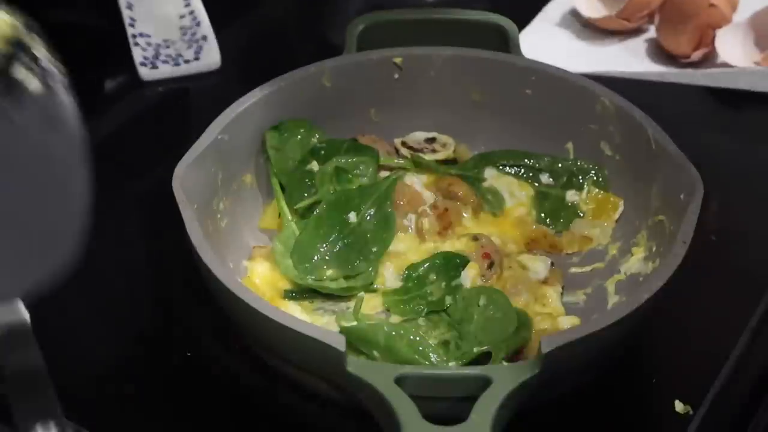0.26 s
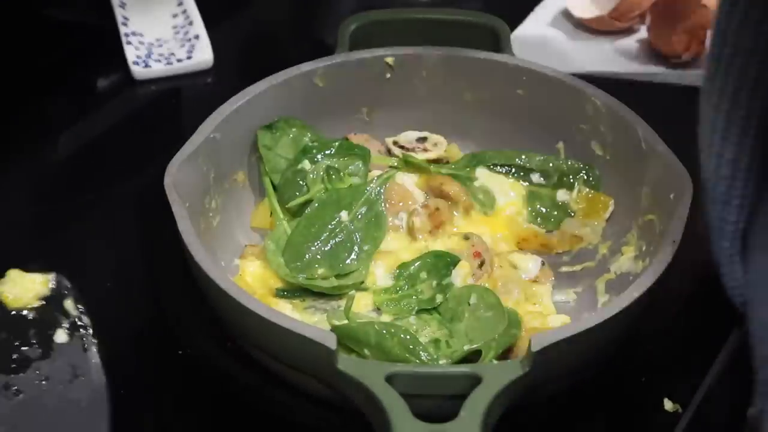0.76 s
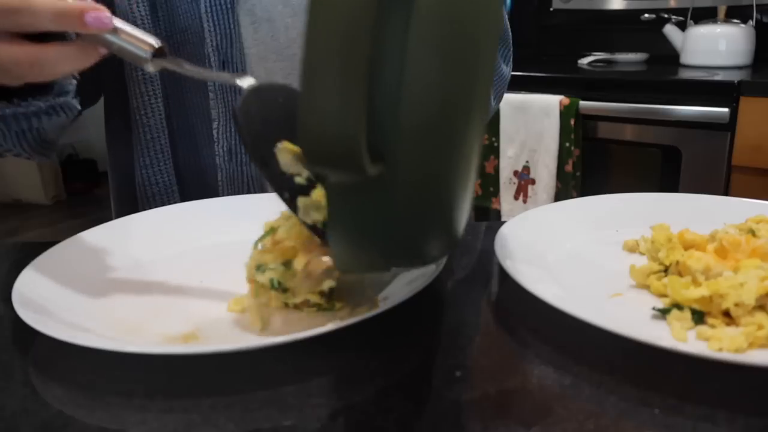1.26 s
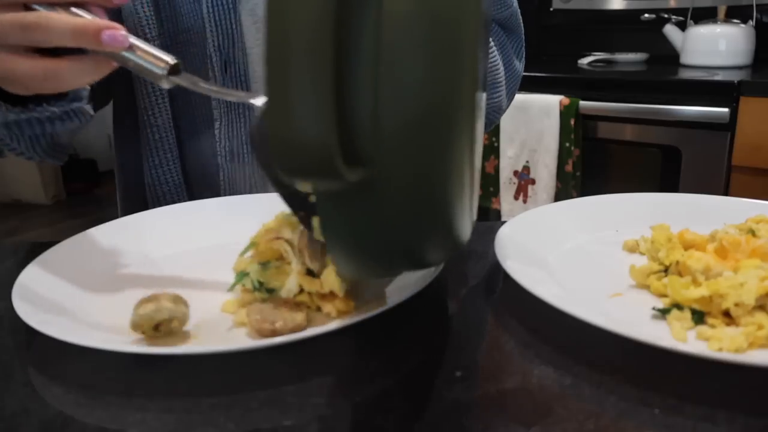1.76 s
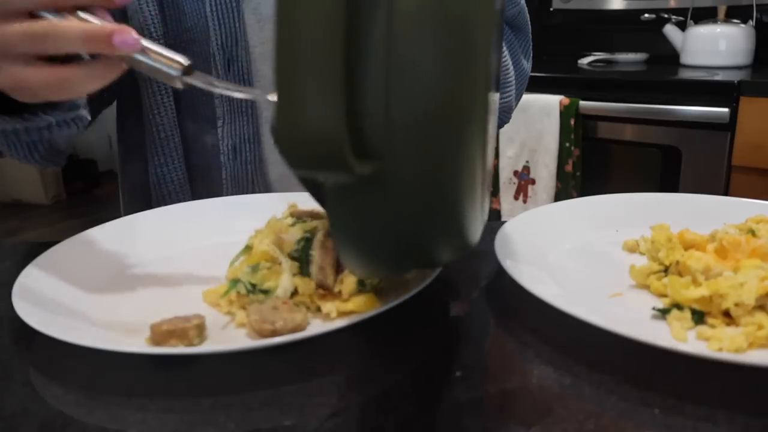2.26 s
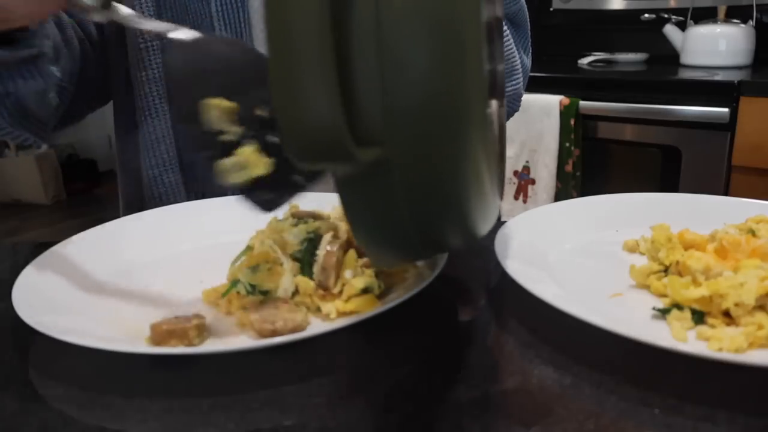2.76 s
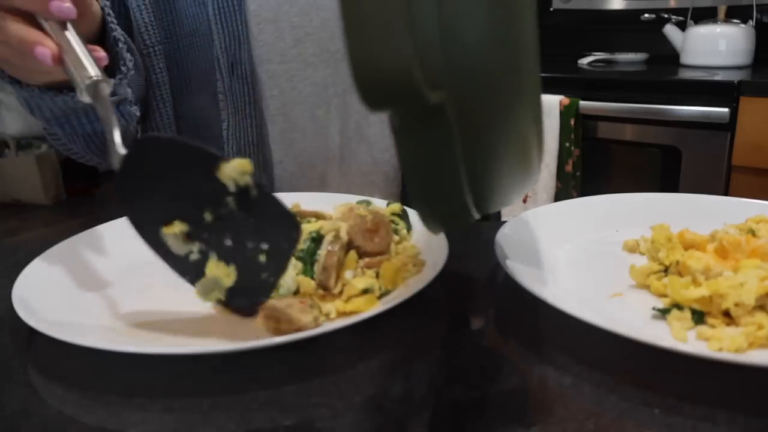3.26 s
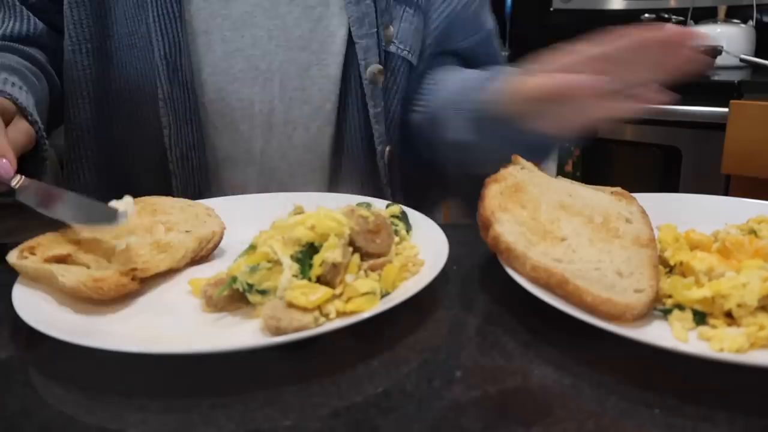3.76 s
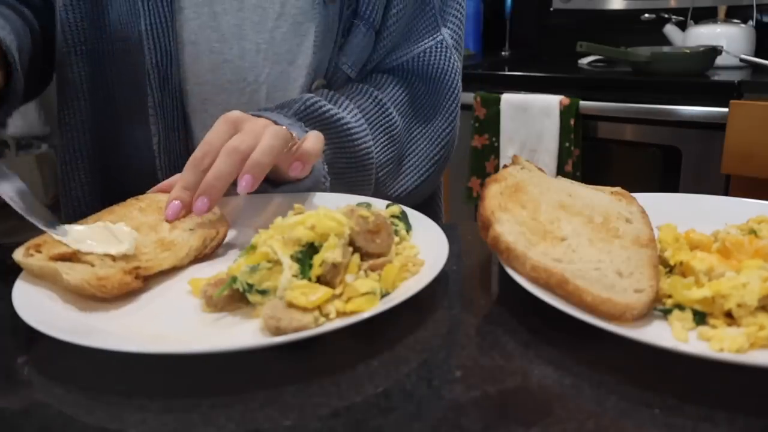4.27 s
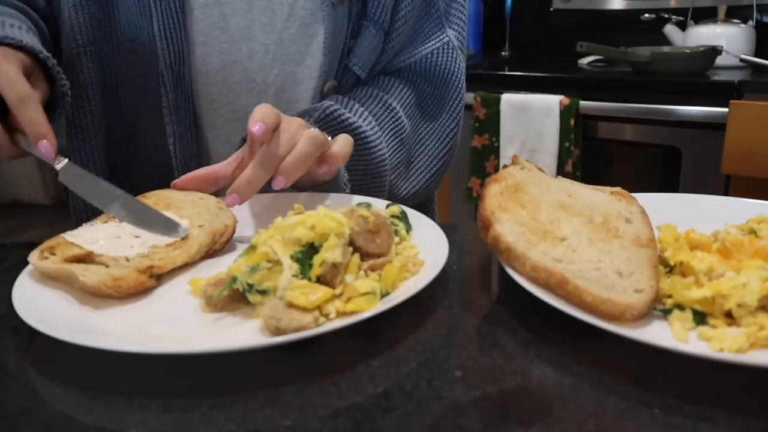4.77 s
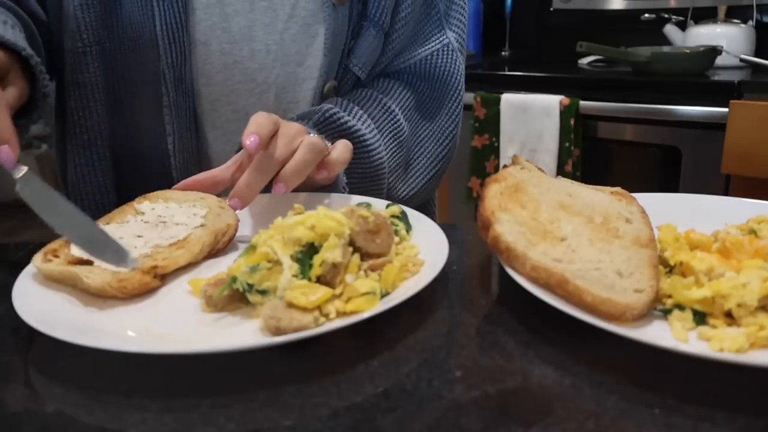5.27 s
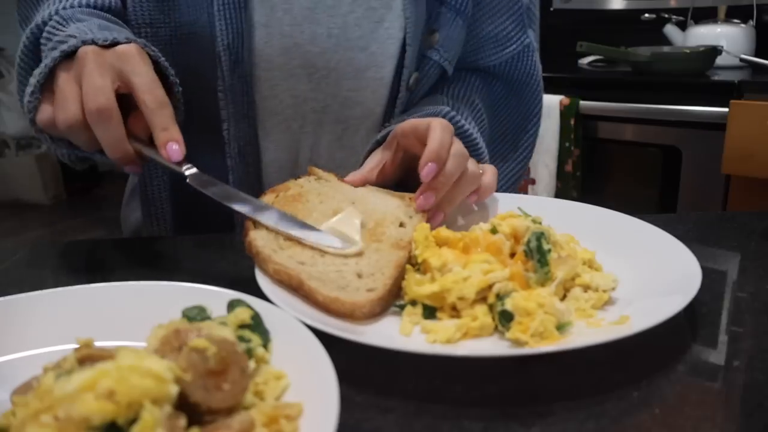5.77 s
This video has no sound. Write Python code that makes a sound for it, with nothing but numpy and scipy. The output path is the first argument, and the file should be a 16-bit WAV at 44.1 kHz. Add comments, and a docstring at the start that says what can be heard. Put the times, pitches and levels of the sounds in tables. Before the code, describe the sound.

Eggs sizzle in a pan with a loud utensil clank, then soft spatula taps on a plate, then a knife scrapes butter over crisp toast.

```python
"""A knife taps, bites and scrapes butter over crisp toast on a plate: clumped grains of noise and short noise
bursts, passed through the ringing tones of plate and knife. Earlier, a spatula taps pan and plate while serving;
hard walls answer all these taps and snaps. At the start eggs sizzle in a pan (grainy noise with tiny tone spits) and
a utensil bangs down by the stove (noise bursts, rattle and a boom). Appliances rumble throughout (noise and hum).
"""
import sys
import numpy as np
from scipy import signal
from scipy.fft import rfft, irfft, next_fast_len
from scipy.io import wavfile
from scipy.ndimage import uniform_filter1d, map_coordinates

SR = 44100
rng = np.random.default_rng(int(sys.argv[2]) if len(sys.argv) > 2 else 0)


def transcribe(signal):
    """Save signal, clipped to [-1, 1], as a 16-bit WAV file at the path in sys.argv[1]."""
    frames = np.atleast_2d(signal).T
    limited = np.clip(frames, -1, 1)
    pcm = np.round(limited * 32767).astype(np.int16)
    wavfile.write(sys.argv[1], SR, pcm)


N = 265349  # length [samples]

# Moments when ringing tails stop short; the sizzle ends at the first: time [s]
TAIL_STOPS = [1.167, 5.572]
TOAST_FROM_S = 3.7  # from here on, knocks pass through the toast into plate and knife

# Appliance rumble before its slow wobble: (time [s], level [dB])
RUMBLE_LEVEL = [(0, -55.5), (1.1, -54), (1.3, -51.5), (2.4, -51), (3.7, -52.5), (5.3, -49), (6.02, -52.5)]
# Colour of the rumble and air hiss: (frequency [Hz], relative level per Hz [dB])
RUMBLE_COLOUR = [(15, -54), (25, -42.5), (59, -18), (91, -10.5), (107, -13.5), (188, -4), (322, -14.5),
                 (359, -17.5), (457, -21.5), (1020, -31), (1140, -33), (2180, -35.5), (2560, -37),
                 (7920, -44.5), (15500, -52)]
# Wavering drones: (centre [Hz], width [Hz], level [dB])
DRONES = [(126, 28, -61), (196, 30, -59.5), (248.7, 34, -61.5)]
# A motor's steady tone before its wobble: (frequency [Hz], peak level [dB])
MOTOR_HUM = (119, -56.5)

# Sizzle before its wobble: (time [s], level [dB])
SIZZLE_LEVEL = [(0, -46), (.3, -45), (.6, -45), (1.16, -47)]
# Colour of the frying noise: (frequency [Hz], relative level per Hz [dB])
FRYING_COLOUR = [(290, -37.5), (500, -8), (629, -8), (770, -14.5), (914, -9.5), (1120, -13), (1240, -4.5),
                 (1770, -6.5), (2050, 0.5), (2890, -3), (3430, -9.5), (3910, -5), (5510, -3), (6010, -7.5),
                 (15500, -15.5)]
# Fat bursts: (time [s], peak level [dB], pitch [Hz])
FAT_SPITS = [(.179, -35.5, 10000), (.26, -25, 8000), (.287, -29, 2410), (0.315, -29, 3800),
             (.318, -31.5, 2200), (0.541, -26.5, 1800)]

# Blows by the stove: (time [s], strength [dB], body [Hz], crack against body [dB])
STOVE_BLOWS = [(.697, -21.5, 1302, -3.5), (.703, -23.5, 1289, -3), (0.762, -26.5, 1898, -25.5),
               (0.8045, -2, 1991, -1.5), (0.8065, -7, 1270, -4), (0.8121, -4.5, 1969, 4),
               (1.159, -37, 2017, -23)]
# Colour of the rattle after a blow: (frequency [Hz], relative level per Hz [dB])
RATTLE_COLOUR = [(50, -43.5), (90, -11), (300, -11), (500, -6), (800, -5), (1010, -7), (1300, -8.5),
                 (2000, -3), (2700, -11), (3600, -9), (5500, -13), (7200, -12.5), (8800, -25.5),
                 (15500, -31)]
# Resonances of the stove top: (centre [Hz], width [Hz], relative level [dB])
STOVE_TOP = [(506, 71, -5), (1020, 28, -3), (1210, 29, -10.5), (1570, 6.5, -5.5), (2270, 18, -6),
             (2630, 100, -6.5), (2964, 130, -4), (4400, 41, -7), (4900, 49, -9.5), (5316, 81, -9.5),
             (6370, 55, -9.5), (6480, 94, -8), (7080, 210, -9), (8000, 28, -14)]
# Boom of the stove's cabinet under a blow: (frequency [Hz], level at a 0 dB blow [dB], 60 dB decay [s])
CABINET_BOOM = (120, -30, 0.21)

# Ringing tones of plate, pan and knife; the listed decay is later scaled for how freely the thing rings:
# (frequency [Hz], relative level [dB], listed 60 dB decay [s])
PLATE_TONES = [(490, -3, .2), (851, -9, .18), (1305, -4, .2), (1803, -5, .25), (2355, -7, .28),
               (2970, -12, .2), (3652, -4, .24), (4420, -8, .18), (5254, -8, .15), (6196, -12, .13),
               (7176, -12, .09), (8236, -22, .1)]
PAN_TONES = [(743.4, 3.5, 0.26), (1118, 7, 0.11), (1213, -2, 0.13), (1336, 4, 0.18), (1478, -6, 0.14),
             (2158, -17, 0.28), (2680, 2.5, 0.25)]
KNIFE_TONES = [(1222, 0, .11), (2659, -12, .1), (4150, -8, .05), (5480, -8, .08), (5780, -4, .04),
               (6050, -10, .14), (7200, -8, .06), (9000, -4, .12), (11300, -2, .12), (12900, -7, .08),
               (13700, -6, .1), (15200, -6, .08)]
# Where a blow lands picks the tones that ring: (time [s], strength [dB], centre [Hz], reach [octaves])
PLATE_HITS = [(1.168, -50, 2000, .3), (2.039, -55.5, 2880, 0.48), (3.133, -50.5, 636, 0.82),
              (4.105, -44, 4850, .43), (5.065, -31.5, 4300, 1.16), (5.078, -27, 550, 1.03),
              (5.85, -53, 5300, .2), (5.915, -38, 5240, .37)]
PAN_HITS = [(1.462, -57, 1930, 0.56), (1.537, -64.5, 1150, 0.25), (1.621, -59, 1485, .11),
            (1.77, -64.5, 764, .16), (2.187, -53, 2176, .12), (2.542, -60.5, 1250, .99),
            (3.325, -56, 1218, .06), (3.514, -57.5, 1240, 0.063)]
KNIFE_HITS = [(3.133, -53, 9000, .6), (4.278, -36, 8500, 1.4), (4.282, -37.5, 8500, 1.4),
              (4.563, -36, 1215, .6), (4.692, -19.5, 1222, .9), (5.942, -43, 7000, .9),
              (5.978, -31.5, 10000, 1.1)]

# Spatula, pan and toast meet the plate:
# (time [s], strength [dB], body [Hz], crack against body [dB], 60 dB decay [s])
PLATE_KNOCKS = [(1.31, -55, 1192, -4, 0.035), (1.461, -53, 896, -29.5, 0.066), (1.537, -53, 1140, -22, .06),
                (1.61, -49.5, 1500, -5, 0.046), (1.67, -58, 1486, 4, 0.045), (1.769, -53, 755, 2, .04),
                (1.878, -50, 2070, -3, .17), (1.991, -48, 960, -23, 0.074), (2.041, -46, 598, -20.5, .08),
                (2.54, -49, 956, -22, 0.2), (3.133, -35.5, 580, -4.5, 0.12),
                (3.322, -51, 1210, -1.5, 0.081), (3.512, -46, 498, -30, 0.081),
                (3.768, -42, 776, -31, 0.31), (3.912, -49, 970, -19.5, .07)]
# The knife lands on the toast and bounces once:
# (time [s], strength [dB], body [Hz], crack [Hz], bounce delay [s])
KNIFE_LANDINGS = [(4.031, -24.5, 1032, 4030, .014), (4.275, -30, 1730, 10000, .008),
                  (4.565, -31.5, 1290, 6597, .013), (4.692, -18, 1250, 5100, .007),
                  (5.066, -25.5, 793, 5300, .013)]
# Short snaps of crust and first light touches of the knife just before it lands:
# (time [s], strength [dB], body [Hz])
SNAPS_AND_LIGHT_TOUCHES = [(4.149, -46, 1510), (4.173, -43, 1800), (4.25, -53.5, 2760), (4.558, -41, 1510),
                           (4.612, -43, 1500), (4.649, -32, 1000), (4.685, -31.5, 2000), (4.802, -24, 1870),
                           (4.868, -17.5, 1860), (4.879, -18, 1530), (4.897, -19, 1503), (5.27, -38, 2500),
                           (5.311, -32, 2190), (5.35, -23.5, 1710), (5.393, -11.5, 1540),
                           (5.404, -13, 1560), (5.423, -10.5, 1213), (5.432, -12.5, 1028),
                           (5.695, -41.5, 1400), (5.709, -37.5, 2940), (5.743, -43, 5980),
                           (5.759, -35.5, 1160), (5.787, -46, 2000), (5.845, -38, 880),
                           (5.915, -37.5, 5270), (5.942, -25, 2000), (5.949, -25.5, 3570),
                           (5.959, -26, 2476), (5.978, -23.5, 4630), (5.987, -27, 1990)]

# Strokes of the knife over the bread, each a list of (time [s], scrape strength [dB])
KNIFE_STROKES = [
    [(3.78, -67.5), (3.84, -67), (4.02, -72)],
    [(4.05, -38), (4.07, -55), (4.158, -53.5), (4.21, -66), (4.27, -54.5)],
    [(4.57, -37.5), (4.64, -46.5), (4.685, -43.5)],
    [(4.7, -34.5), (4.756, -35), (4.848, -33), (4.875, -29.5), (4.948, -32.5), (5.016, -51), (5.06, -51.5)],
    [(5.27, -59), (5.354, -33), (5.372, -22), (5.422, -18.5), (5.454, -29.5), (5.544, -41.5),
     (5.571, -48.5)],
    [(5.7, -54), (5.76, -51.5), (5.858, -47.5), (5.9, -59), (5.956, -41.5), (6.017, -42)],
]
# Colour of the toast and of the blade's edge: (frequency [Hz], relative level per Hz [dB])
TOAST_COLOUR = [(120, -37.5), (200, -13), (380, -6), (483, 7), (624, 2.5), (690, 6), (1600, -1.5),
                (1790, 2), (3920, -11.5), (6000, -29), (7800, -59), (13200, -120)]
EDGE_COLOUR = [(1470, -48), (2500, -16), (3450, -2), (4750, -4.5), (5790, -2.5), (6300, -5), (7450, -9),
               (7980, -6), (9370, -10.5), (13300, -7), (15500, -11.5)]
# Scrape colour as the blade travels: (time [s], hollow of the toast [Hz], edge hiss over the scrape [dB])
BLADE_TRAVEL = [(3.78, 940, -16), (3.95, 940, -1.5), (4.07, 1200, -3.5), (4.26, 1200, -1.5),
                (4.6, 1300, -5.5), (4.75, 1240, -6.5), (4.88, 1480, -2), (5.06, 1150, -9),
                (5.27, 1300, 3.5), (5.354, 1670, 2), (5.42, 1150, -9), (5.455, 1090, 1), (5.55, 1079, -9),
                (5.75, 1100, -5), (5.82, 1450, -0.5), (5.9, 1030, 1.5), (6.017, 1500, 0)]

# How alike left and right are, for near sounds, the stove and the air: (frequency [Hz], likeness [-1 to 1])
NEAR_ALIKE = [(60, 0.99), (180, 1), (550, 0.99), (1650, 1), (4970, 0.84), (15000, -0.75)]
STOVE_ALIKE = [(60, 0.72), (180, 1), (550, 0.94), (1650, 0.99), (4970, 0.9), (15000, 0.23)]
AIR_ALIKE = [(60, 0.94), (180, 0.99), (550, 0.82), (1650, -0.8), (4970, -0.13), (15000, -0.2)]
# How long the room answers: (frequency [Hz], 60 dB decay [s])
WALL_DECAY = [(200, 0.83), (1000, 0.372), (5000, 0.34), (12000, 0.49)]


def amp(db):
    """Turn decibels into a plain factor."""
    return 10 ** (np.asarray(db) / 20)


def unit(x):
    """Scale to an average power of one."""
    return x / np.sqrt(np.mean(x ** 2) + 1e-20)


def along(points, hz):
    """Read a value between (frequency, value) points on a log axis."""
    f, v = np.transpose(points)
    return np.interp(np.log(hz + 1), np.log(f + 1), v)


def wobble(rate):
    """Draw a random curve with so many random points a second, joined smoothly."""
    points = rng.standard_normal(int(N * rate / SR) + 4)
    return map_coordinates(points, [np.arange(N) * rate / SR])


def filtered(x, response):
    """Strengthen or weaken each frequency of x as the response says."""
    n = x.shape[-1]
    padded = next_fast_len(n + 8192)
    hz = np.fft.rfftfreq(padded, 1 / SR)
    return irfft(rfft(x, padded) * response(hz), padded)[..., :n]


def resonance(hz, centre_hz, width_hz):
    """Response of something that swings most readily at one pitch."""
    swing = 1j * hz * width_hz
    return swing / (centre_hz ** 2 - hz ** 2 + swing + 1e-9)


def stereo_shares(alike, hz):
    """Middle and side shares that make left and right as alike as asked."""
    angle = np.arccos(np.clip(along(alike, hz), -1, 1)) / 2
    return np.array([np.cos(angle), np.sin(angle)])


def pair(sources, spectrum, alike):
    """Colour two unrelated signals and mix them to left and right, at unit power."""
    mid, side = filtered(sources, lambda hz: amp(along(spectrum, hz)) * stereo_shares(alike, hz))
    return unit(np.array([mid + side, mid - side]))


def grainy(rate, spread_db, share):
    """Two noises swelling together in tiny bursts of uneven size, rate of them a second on average."""
    happens = rng.random(N) < rate / SR
    size = happens * amp(spread_db * np.minimum(rng.exponential(1, N), 4))
    gate = unit(signal.lfilter([1], [1, -.96], size))  # each burst fades quickly
    share = np.clip(share, 0, 1)
    return rng.standard_normal((2, N)) * (1 - share + share * gate)


def patchy(x, depth_db, tall=2, wide=10):
    """Make random patches of time and frequency louder or softer."""
    z = signal.stft(x, nperseg=384)[2]
    field = uniform_filter1d(rng.standard_normal(z.shape[1:]), size=tall, axis=0)
    field = uniform_filter1d(field, size=wide, axis=1)
    return signal.istft(z * amp(depth_db * unit(field)), nperseg=384)[1][:, :x.shape[1]]


def burst(t, body_hz, crack_db, t60, crack_hz, alike):
    """Two things touch: fast-dying noise with a broad hump at the body and a crack at its own pitch."""
    fade = amp(-60 * t / max(t60, .002))
    rise = 1 - np.exp(-t / (.012 * t60))  # short contacts rise fastest
    noise = rng.standard_normal((2, len(t))) * fade * rise

    def colour(hz):
        hump = resonance(hz, body_hz, .9 * body_hz) ** 2 * np.sqrt(SR / body_hz / 8)
        crack = amp(crack_db) * resonance(hz, crack_hz, .7 * crack_hz) ** 2
        return (hump + crack) * stereo_shares(alike, hz)

    mid, side = filtered(noise, colour)
    return np.array([mid + side, mid - side]) / np.abs(mid).max()


def ring(t, modes, centre_hz, reach, decay_factor):
    """A struck thing sings: tones near the centre are loudest; high ones differ more in phase left and right."""
    out = np.zeros((2, len(t)))
    for hz, db, t60 in modes:
        level_luck, ear_luck, phase = rng.standard_normal(3)
        struck_db = db + 1.5 * level_luck - 6 * (np.log2(hz / centre_hz) / reach) ** 2
        ear_phase = np.array([[ear_luck], [-ear_luck]]) * hz / 12000
        fade = amp(struck_db - 60 * t / (t60 * decay_factor))
        out += fade * np.sin(2 * np.pi * hz * t + phase + ear_phase)
    return out * (1 - np.exp(-t / 0.00041))


def ringing(x, modes):
    """Play x into ringing tones; the bread muffles the low ones."""
    def response(hz):
        muffle = hz ** 2 / (hz ** 2 + 2200 ** 2)
        # this width makes each tone die in about a third of its listed decay
        return muffle * sum(amp(db) * resonance(hz, c, 6 / t60) for c, db, t60 in modes)

    return filtered(x, response)


def walls(x):
    """Hard walls answer with a noise tail in which each frequency dies at its own speed."""
    hz, t, z = signal.stft(rng.standard_normal((2, SR // 2)), SR, nperseg=256)
    fade = amp(-60 * t / along(WALL_DECAY, hz)[:, None])
    tail = signal.istft(z * fade, SR, nperseg=256)[1]
    tail = pair(tail, [(20, 0)], NEAR_ALIKE)
    delayed = np.pad(x.mean(0), (300, 0))[None]  # the answer starts 300 samples later
    return signal.fftconvolve(delayed, tail / np.linalg.norm(tail[0]), axes=1)


def add(out, s, sound):
    """Place a sound at s seconds; it ends at the next tail stop at the latest."""
    start = round(s * SR)
    stop = round(min([c for c in TAIL_STOPS if c > s] + [N / SR]) * SR)
    n = min(sound.shape[1], stop - start)
    out[:, start:start + n] += sound[:, :n]


def kitchen():
    """Appliances rumble as coloured noise with faint air hiss, wavering drones and a motor's hum."""
    now = np.arange(N) / SR
    s, db = np.transpose(RUMBLE_LEVEL)
    level = amp(np.interp(now, s, db) + 1.2 * wobble(3.9))
    air = level * pair(rng.standard_normal((2, N)), RUMBLE_COLOUR, AIR_ALIKE)
    drones = np.zeros(N)
    for hz, width_hz, db in DRONES:
        # noise squeezed into a narrow band wavers like an unsteady tone
        narrow = filtered(rng.standard_normal(N), lambda f: resonance(f, hz, width_hz) ** 2)
        drones += amp(db) * unit(narrow)
    hum_hz, hum_db = MOTOR_HUM
    hum = amp(hum_db + 1.4 * wobble(5.3)) * np.sin(2 * np.pi * hum_hz * now)
    return air + drones + hum


def sizzle():
    """Steam bubbles burst in the fat: a dense fizz of grainy noise with single spits."""
    s, db = np.transpose(SIZZLE_LEVEL)
    now = np.arange(N) / SR
    level = amp(np.interp(now, s, db) + 0.46 * wobble(6.3)) * (now < TAIL_STOPS[0])
    bubbles = grainy(rate=1500., spread_db=2.5, share=.22)
    out = level * patchy(pair(bubbles, FRYING_COLOUR, STOVE_ALIKE), depth_db=1.0)
    t = np.arange(200) / SR
    for s, db, hz in FAT_SPITS:
        spit = amp(db - 60 * t / 0.0016) * np.sin(2 * np.pi * hz * t)
        add(out, s, spit * np.ones((2, 1)))
    return out


def stove_top(hz):
    """The stove top passes a blow on and adds its own resonances."""
    return 1 + amp(11.5) * sum(amp(db) * resonance(hz, c, w) for c, w, db in STOVE_TOP)


def thick_metal(hz):
    """Thick metal lets little through above 8 kHz."""
    x = hz / 8200
    return 1 / (1 + 1.85j * x - x ** 2) / (1 + .6j * x - x ** 2)


def bangs():
    """Hard blows on the stove top, which rings briefly, rattles on and booms in its cabinet."""
    crack_at_0db_hz, t60_at_0db_s = 6800, .013
    brighter_db, shorter_db = 22, 13  # so much harder a blow doubles the crack's pitch, halves its length
    rattle_db = -20  # against the blow
    boom_hz, boom_db, boom_t60 = CABINET_BOOM
    out, t = np.zeros((2, N)), np.arange(SR // 2) / SR
    rattle_fade = amp(-60 * t / 0.32) + amp(-18.5 - 60 * t / .9)  # a quick part and a faint slow one
    rattle_shape = amp(rattle_db) * rattle_fade * (1 - np.exp(-t / 0.001))
    boom = amp(boom_db - 60 * t / boom_t60) * np.sin(2 * np.pi * boom_hz * t) * (1 - np.exp(-t / .008))
    for s, db, body_hz, crack_db in STOVE_BLOWS:
        t60 = t60_at_0db_s * 2 ** (-db / shorter_db)
        crack_hz = crack_at_0db_hz * 2 ** (db / brighter_db)
        blow = filtered(burst(t, body_hz, crack_db, t60, crack_hz, STOVE_ALIKE), thick_metal)
        rattle = rattle_shape * pair(rng.standard_normal((2, len(t))), RATTLE_COLOUR, STOVE_ALIKE)
        add(out, s, amp(db) * (filtered(blow + rattle, stove_top) + boom))
    return out


def contacts():
    """List every touch: (time [s], strength [dB], body [Hz], crack [dB], 60 dB decay [s], crack [Hz])."""
    knock_crack_hz, sharper_db = 5540, 30  # crack pitch at 0 dB; so much more crack doubles it
    land_t60_s, land_crack_db, bounce_db, bounce_crack_db = 0.055, -1.5, -4, -12
    snap_t60_s, snap_crack_db, snap_crack_hz = .028, -7.5, 6265
    touches = []
    for s, db, hz, crack_db, t60 in PLATE_KNOCKS:
        touches.append((s, db, hz, crack_db, t60, knock_crack_hz * 2 ** (crack_db / sharper_db)))
    for s, db, hz, crack_hz, gap in KNIFE_LANDINGS:
        touches.append((s, db, hz, land_crack_db, land_t60_s, crack_hz))
        touches.append((s + gap, db + bounce_db, hz, bounce_crack_db, land_t60_s, crack_hz))
    for s, db, hz in SNAPS_AND_LIGHT_TOUCHES:
        touches.append((s, db, hz, snap_crack_db, snap_t60_s, snap_crack_hz))
    return touches


def taps():
    """Knocks, knife touches and crust snaps burst; plate, pan and knife ring; the walls answer each."""
    out, t = np.zeros((2, N)), np.arange(SR // 3) / SR
    for s, db, *colour in contacts():
        knock = amp(db) * burst(t, *colour, NEAR_ALIKE)
        if s > TOAST_FROM_S:
            knock = knock + amp(4) * ringing(knock, PLATE_TONES + KNIFE_TONES)
        add(out, s, knock)
        add(out, s, amp(-7) * walls(knock))
    # the last two numbers: factor on the listed decay before and after the toast is reached
    struck = ((PLATE_TONES, PLATE_HITS, 1.6, 0.74),  # fingers and toast hold the plate later on
              (PAN_TONES, PAN_HITS, 1.37, 1.37),
              (KNIFE_TONES, KNIFE_HITS, 0.58, 0.58))
    for modes, hits, free, held in struck:
        for s, db, centre_hz, reach in hits:
            tone = amp(db) * ring(t, modes, centre_hz, reach, held if s > TOAST_FROM_S else free)
            add(out, s, tone)
            add(out, s, amp(-12.5) * walls(tone))
    return out


def scraping():
    """Crumbs break under the blade: clumped grains through toast, plate and knife, a finer hiss from the edge."""
    now = np.arange(N) / SR
    s, hz, db = np.transpose(BLADE_TRAVEL)
    hollow_hz, hiss_db = np.interp(now, s, hz), np.interp(now, s, db)
    strength = np.zeros(N)
    for stroke in KNIFE_STROKES:
        s, db = np.transpose(stroke)
        on = np.clip(np.minimum(now - s[0], s[-1] + .004 - now) / .004, 0, 1)  # 4 ms fades
        strength += on * amp(np.interp(now, s, db))
    clumps = amp(1.6 * wobble(120))  # the crust gives way unevenly
    crumbs = grainy(rate=1300., spread_db=4., share=.42)
    toast = patchy(pair(crumbs, TOAST_COLOUR, NEAR_ALIKE), depth_db=3.5)
    # the toast's hollow moves as the blade travels: a cross-fade of fixed resonances
    hollow = np.zeros((2, N))
    for c in (700, 950, 1300, 1750, 2400):
        nearness = np.exp(-(np.log2(hollow_hz / c) / 0.301) ** 2)
        hollow += nearness * filtered(toast, lambda hz: resonance(hz, c, 0.28 * c))
    fine = 0.72 * unit(crumbs) + 0.59 * rng.standard_normal((2, N))
    edge = patchy(pair(fine, EDGE_COLOUR, NEAR_ALIKE), depth_db=3.5)
    scrape = clumps * strength * (unit(toast + 0.9 * hollow) + amp(hiss_db) * unit(edge))
    # ringing from before the second tail stop does not carry past it
    before = now < TAIL_STOPS[1]
    tones = PLATE_TONES + KNIFE_TONES
    rung = before * ringing(scrape * before, tones) + ringing(scrape * ~before, tones)
    return scrape + amp(3.5) * rung


def scene():
    """Add the background, the stove, the taps and the scraping knife."""
    return kitchen() + sizzle() + bangs() + taps() + scraping()


def record(dry):
    """Round off the loudest peaks at a ceiling and let nothing pass above the band limit."""
    top_hz = 15700
    rounded = dry / (1 + np.abs(dry) ** 10) ** (1 / 10)
    return np.clip(filtered(rounded, lambda hz: hz < top_hz), -1, 1)


dry = scene()
out = record(dry)
transcribe(out)
```